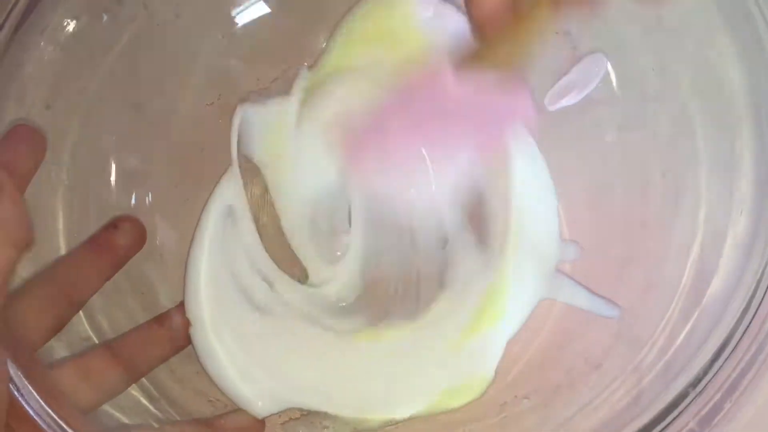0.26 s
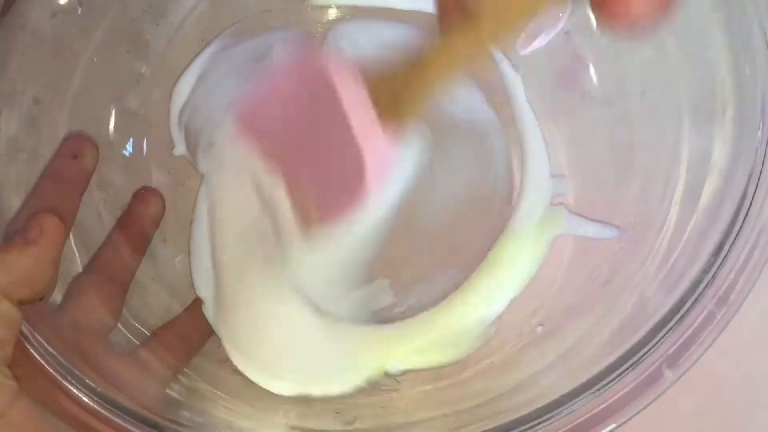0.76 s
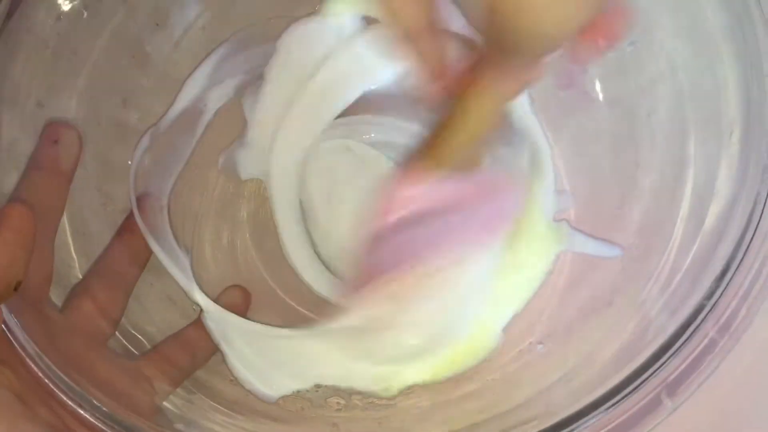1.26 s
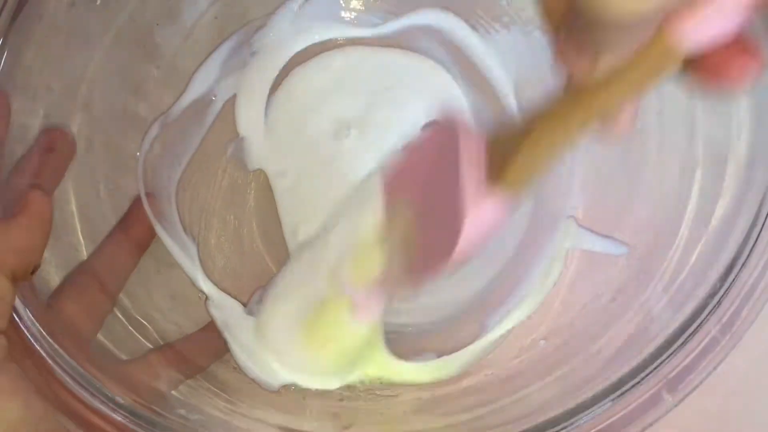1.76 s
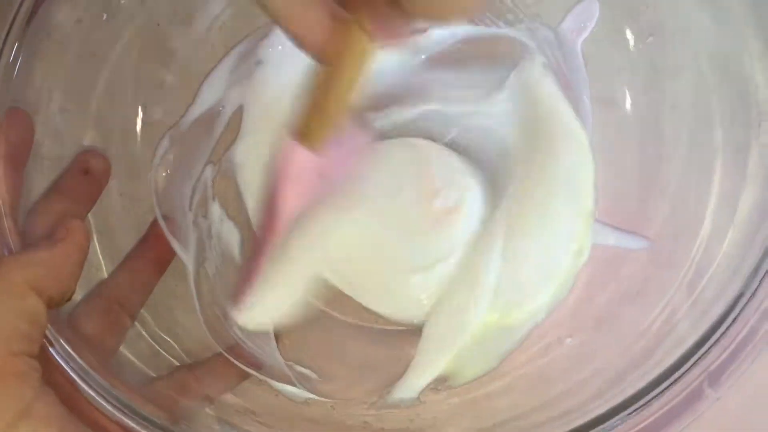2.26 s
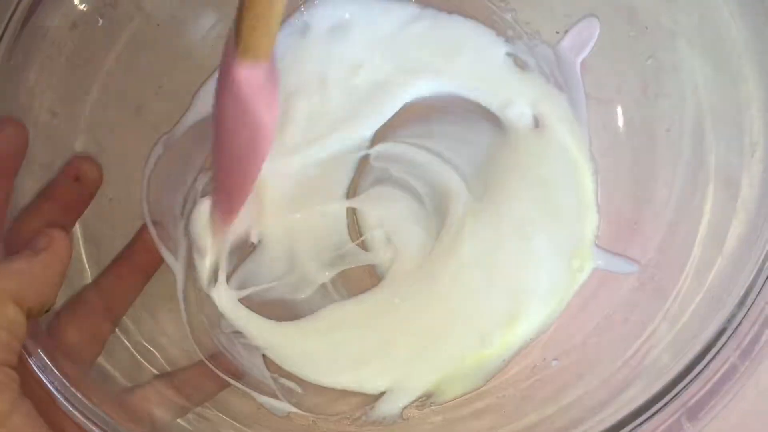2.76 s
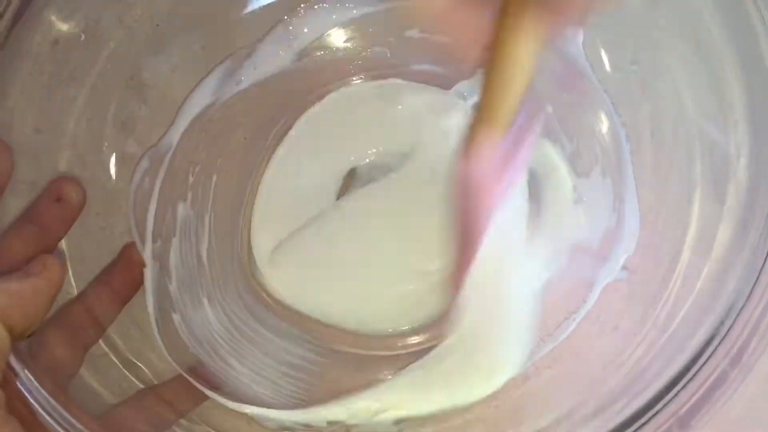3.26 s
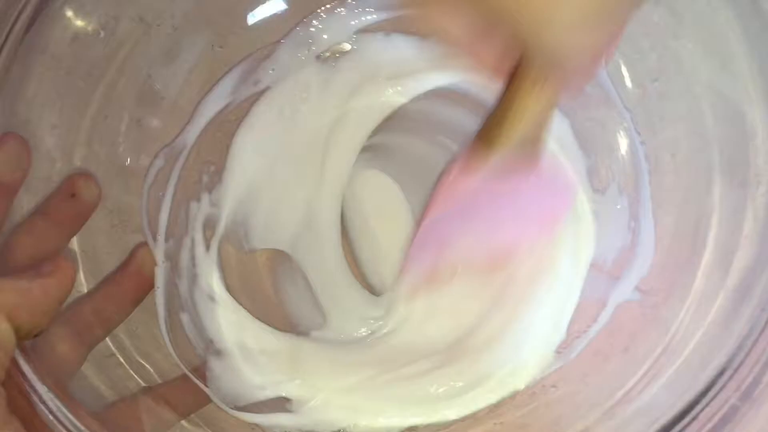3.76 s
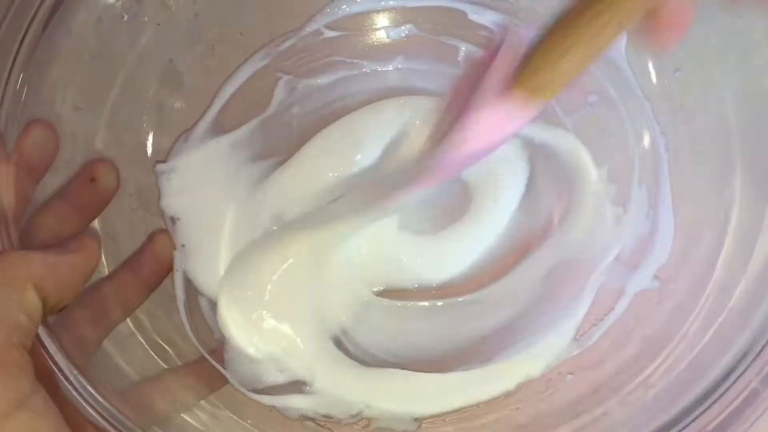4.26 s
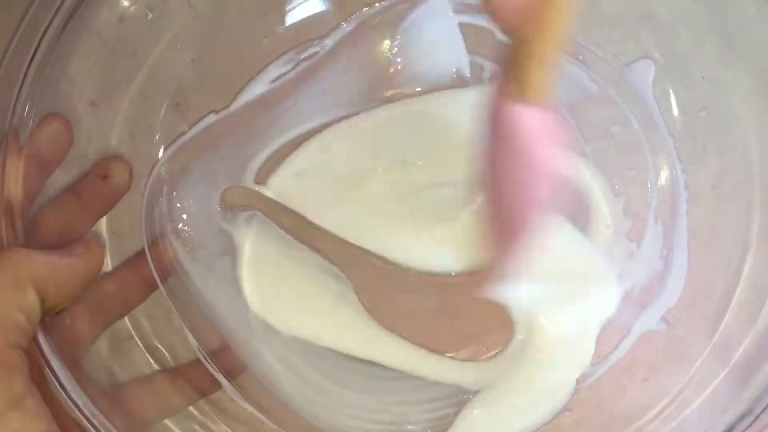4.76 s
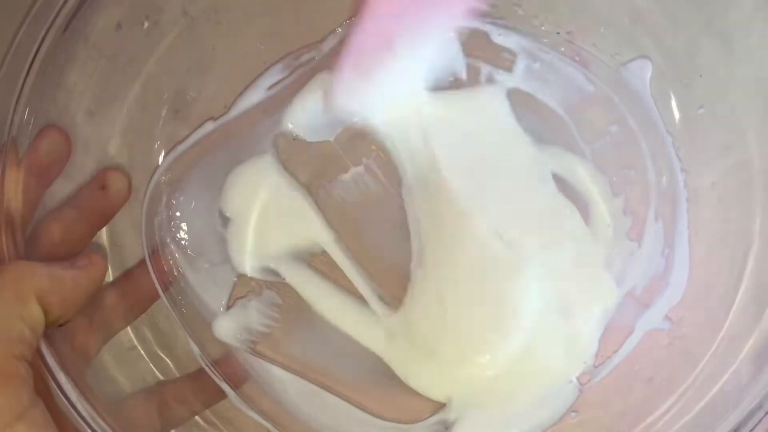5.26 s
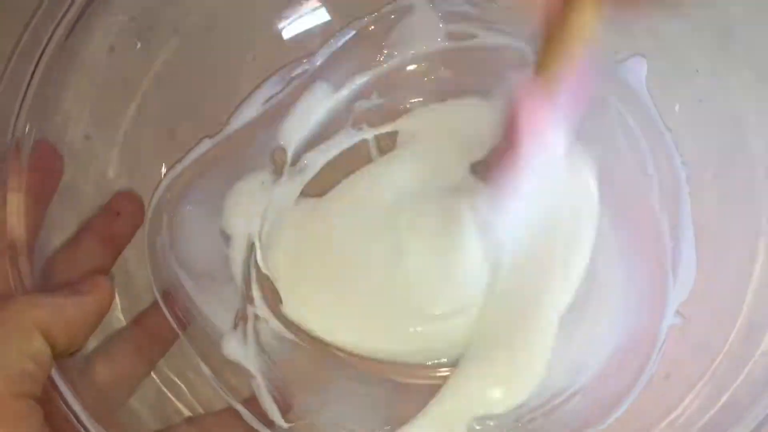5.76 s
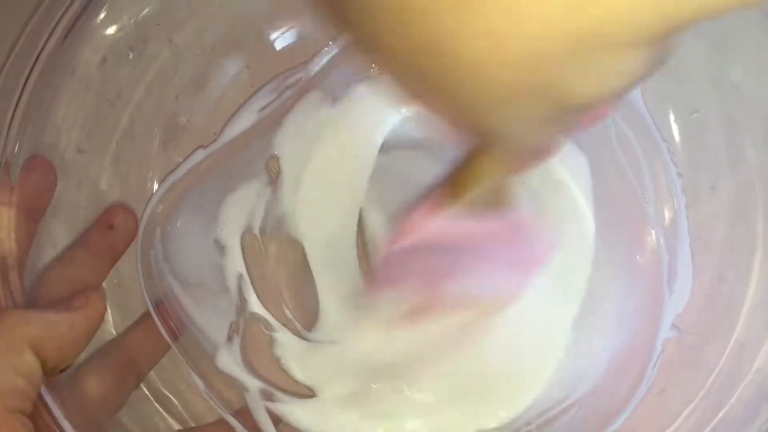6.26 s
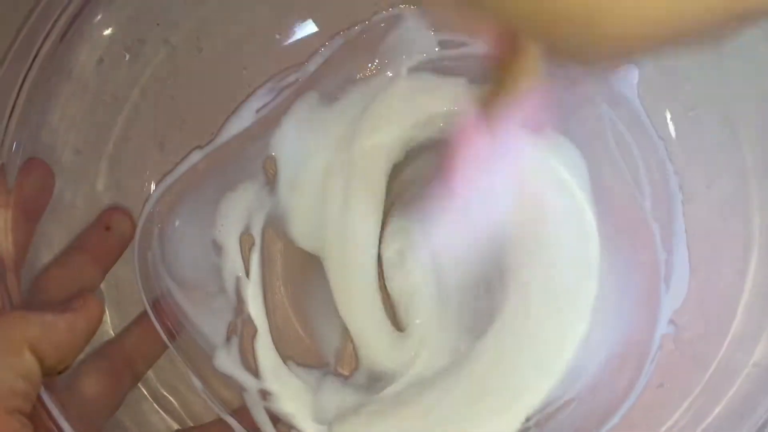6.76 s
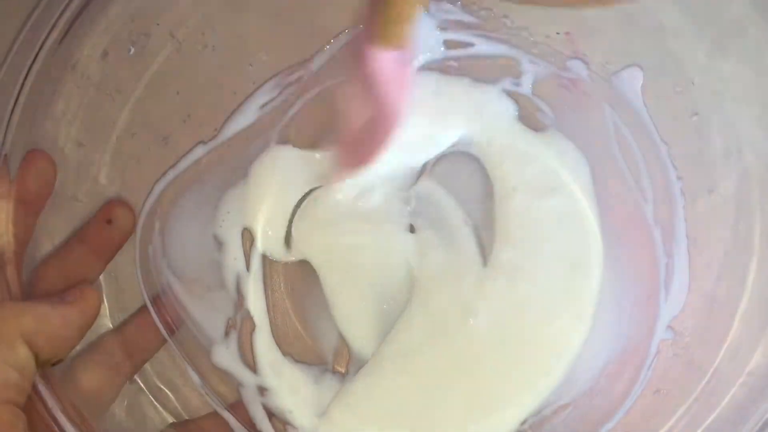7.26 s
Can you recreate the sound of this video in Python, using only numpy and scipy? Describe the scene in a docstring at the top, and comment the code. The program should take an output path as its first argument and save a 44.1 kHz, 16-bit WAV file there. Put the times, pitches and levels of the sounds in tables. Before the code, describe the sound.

Gooey slime is stirred close up, squelching, thumping and snapping with crisp air pops over faint hum, then suddenly lower in pitch.

```python
"""A spatula stirs thick glue and soap in a hand-held glass bowl on a table, close to one microphone above.
Each push is a squelch of ringing wet modes and a dull boom of bowl modes; the drag is uneven filtered noise.
Pops, sticky ticks and peels are bursts of gritty noise; the pops add ringing air pockets, and foam rings faintly.
The small room adds short reflections, noise-band air, a wavering sine hum, a low rumble and one brief drone.
Near six seconds the hum and the bowl's boom drop an octave, and the bubbles and squelches sound deeper."""
import sys
import numpy as np
from scipy import signal
from scipy.io import wavfile
from scipy.ndimage import uniform_filter1d

SR = 44100
rng = np.random.default_rng(int(sys.argv[2]) if len(sys.argv) > 2 else 0)


def put_to_file(sound):
    """Save the sound as 16-bit audio at rate SR, in the file named by the first command-line argument."""
    columns = np.atleast_2d(sound).T  # one column per channel
    safe = np.clip(columns, -1, 1)
    whole_steps = np.round(safe * 32767)
    wavfile.write(sys.argv[1], SR, whole_steps.astype(np.int16))


N = 330923
TIME = np.arange(N) / SR
DEEP_FROM_S = 5.95  # the lower pitches start here
TEAR_S = .007  # stretch of film or strand heard before each pop or tick


def from_db(db):
    """Decibels to gain."""
    return 10 ** (np.asarray(db) / 20)


def rms_one(x):
    """Scaled to an rms of 1."""
    return x / np.sqrt(np.mean(x ** 2) + 1e-20)


def add(out, s, sound):
    """Mix a short sound in at a time in seconds."""
    start = max(0, round(s * SR))
    out[start:start + len(sound)] += sound[:max(0, N - start)]


def band(x, low_hz, high_hz, order=2):
    """Causal band-pass."""
    edges = [low_hz, min(high_hz, SR / 2 - 500)]
    return signal.sosfilt(signal.butter(order, edges, "band", fs=SR, output="sos"), x)


def high_pass(x, hz, order=2):
    """Causal high-pass."""
    return signal.sosfilt(signal.butter(order, hz, "high", fs=SR, output="sos"), x)


def pitch_scale(s):
    """1 at first, a half in the deep part: an octave down."""
    return np.where(s > DEEP_FROM_S, .5, 1)


def drift(rate_hz):
    """Slow random wander with a spread of 1, drawn at every 40th sample and interpolated."""
    pole = np.exp(-80 * np.pi * rate_hz / SR)
    white = rng.standard_normal(N // 40 + 2002)
    slow = signal.lfilter([1], [1, -2 * pole, pole * pole], white)[2000:]  # drop the filter's start
    return np.interp(np.arange(N) / 40, np.arange(len(slow)), rms_one(slow))


def coloured_noise(spectrum):
    """Half-octave bands of noise that follow a spectrum; rms 1."""
    hz, db = np.transpose(spectrum)
    edges = 22 * 2 ** np.arange(0, 10, .5)
    white = rng.standard_normal((2, N))  # neighbouring bands use different noise
    out = 0
    for k, (low, high) in enumerate(zip(edges, edges[1:])):
        if high > hz[0] and low < hz[-1]:
            band_db = np.interp(np.log(low * high) / 2, np.log(hz), db)
            out = out + from_db(band_db) * band(white[k % 2], low, high)
    return rms_one(out)


def ring(t, hz, cycles):
    """A sine that falls by 60 dB in so many cycles."""
    return np.sin(2 * np.pi * hz * t) * np.exp(-np.log(1000) * hz * t / cycles)


def grit(t, low_hz, high_hz, clump_db=4):
    """Noise that comes in clumps a third of a millisecond long, as sticky strands part; rms 1."""
    clump_levels = np.clip(rng.standard_normal(len(t) // 16 + 1), -2, 2)
    clumps = from_db(clump_db * clump_levels).repeat(16)[:len(t)]
    return rms_one(band(rng.standard_normal(len(t)) * clumps, low_hz, high_hz, order=1))


def bubbly(x, low_hz, high_hz, sharpness=10, ring_db=5, count=5):
    """A crackle rings a few tiny bubbles next to it, so each has a colour of its own; the energy is kept."""
    rings = 0
    for place in (np.arange(count) + rng.random(count)) / count:
        hz = min(low_hz * (high_hz / low_hz) ** place, 16000)
        rings = rings + signal.lfilter(*signal.iirpeak(hz, sharpness, fs=SR), x)
    return rms_one(x + from_db(ring_db) * rings) * np.std(x)


# spectrum of the room air: (frequency [Hz], relative density [dB per Hz])
AIR_SPECTRUM = [(30, -42.5), (60, -29.5), (100, 4.5), (140, -2.5), (220, 2.5), (330, -11.5), (500, -32),
                (800, -15.5), (1600, -17.5), (3000, -23), (6000, -29), (15500, -30.5)]
# spectrum of the low rumble: (frequency [Hz], relative density [dB per Hz])
RUMBLE_SPECTRUM = [(25, -33.5), (45, 12), (62, -6), (95, 16.5), (125, -5.5), (200, -34), (400, -34.5)]
# hum before it drops and wavers: (frequency [Hz], peak level [dB])
HUM_TONES = [(100, -67.5), (200, -58.5), (243, -94.5)]
AIR_DB = -62.5
FIRST_RUMBLE_DB, FIRST_RUMBLE_S = -50.5, 0.078
DEEP_RUMBLE_DB, RUMBLE_FADE_DB_PER_S = -54.5, 4


def background(low_cut_hz=80, waver_db=3):
    """Room air and a wavering hum; a low rumble sounds briefly at first and again, fading, in the deep part."""
    turns = np.cumsum(pitch_scale(TIME)) / SR  # advances at half speed in the deep part
    hum = 0
    for hz, db in HUM_TONES:
        level = from_db(db + waver_db * drift(3))
        hum = hum + level * np.sin(2 * np.pi * hz * turns + 1.1 * drift(6.6))
    since = TIME - DEEP_FROM_S
    first_swell = (TIME < FIRST_RUMBLE_S) * from_db(FIRST_RUMBLE_DB)
    deep_swell = (since > 0) * from_db(DEEP_RUMBLE_DB - RUMBLE_FADE_DB_PER_S * since)
    swell = uniform_filter1d(first_swell + deep_swell, size=400)  # softened edges
    rumble = swell * from_db(3.5 * drift(9)) * coloured_noise(RUMBLE_SPECTRUM)
    air = high_pass(coloured_noise(AIR_SPECTRUM), low_cut_hz, order=3)
    return from_db(AIR_DB) * air + hum + rumble


# drag of the blade through the glue, before the gains below: (time [s], level [dB])
DRAG_LEVELS = [(0.0, -60), (0.44, -67), (1.15, -62), (1.25, -65), (1.9, -66.5), (2.5, -57), (2.96, -65),
               (3.26, -63.5), (3.74, -51), (4.18, -65.5), (5.49, -66), (5.75, -55.5), (5.97, -53.5),
               (6.43, -55), (6.71, -61), (7.16, -66.5), (7.5, -69)]
# spectrum of the low rub: (frequency [Hz], relative density [dB per Hz])
RUB_SPECTRUM = [(85, -24), (110, -4.5), (140, 6), (180, -2.5), (230, 10.5), (300, -8), (380, 1),
                (520, -2.5), (1200, -14.5), (2500, -38.5), (6000, -34)]
# spectrum of the blade's swish: (frequency [Hz], relative density [dB per Hz])
SWISH_SPECTRUM = [(700, -17), (1200, 1), (2200, -3), (3200, -7), (5000, 0.5), (8000, -9.5), (15000, -15)]


def stirring(rub_db=-1, uneven_db=6.0, smear_db=-13, swish_db=-15, smear_uneven_db=1.5):
    """The blade drags unevenly: a low rub, and a wet smear and swish that are fainter in the deep part."""
    s, drag_db = np.transpose(DRAG_LEVELS)
    drag = from_db(np.interp(TIME, s, drag_db))
    uneven = np.clip(drift(8.9), -2, 1.5)
    lumps = from_db(4.8 * drift(60) + smear_uneven_db * uneven) * pitch_scale(TIME)
    rub = from_db(rub_db + uneven_db * uneven) * coloured_noise(RUB_SPECTRUM)
    smear = from_db(smear_db) * band(grit(TIME, 470, 1800), 460, 7900)
    swish = from_db(swish_db) * coloured_noise(SWISH_SPECTRUM)
    return drag * (rub + (smear + swish) * lumps)


# modes of the bowl, before detuning:
# (multiple of lowest pitch, relative level [dB], decay by 60 dB [own cycles], build-up [cycles of lowest])
BOWL_MODES = [(1.0, -2.5, 15, 2.17), (1.2, -8.5, 15, 3.5), (1.66, 5, 18, 0.65), (2.096, -9, 44, 0.11)]


def bowl_boom(t, hz, boom_db, knock_db, rock_cycles=6.3, rock_db=-11, detune=0.039):
    """The two upper modes swell sooner than the two lower, so the thud falls; the bowl rocks back once."""
    sound = 0
    for multiple, db, cycles, build_cycles in BOWL_MODES:
        mode_hz = hz * multiple * (1 + detune * rng.standard_normal())
        mode = ring(t, mode_hz, cycles) * (1 - np.exp(-(hz * t / build_cycles) ** 3))
        level_db = db + (boom_db if multiple < np.sqrt(2) else knock_db)
        sound = sound + rng.choice([-1, 1]) * from_db(level_db) * mode / np.abs(mode).max()
    lag = int(SR * rock_cycles / hz * rng.uniform(0.93, 1.3))
    return sound + from_db(rock_db) * np.r_[np.zeros(lag), sound[:-lag]]


# wet glue squeezed under the blade, before detuning:
# (multiple of squelch pitch, relative level [dB], decay by 60 dB [cycles])
SQUELCH_MODES = [(.55, -12, 20), (.75, -5, 14), (1.002, 3.5, 17), (1.15, -11.5, 54), (1.4, -3.5, 18)]


def squelch(t, hz, slip_cycles=4.9, slip_fall_db=5.5, detune=0.026, count=6):
    """The blade slips a few times in quick succession; each slip rings the wet cavity under it."""
    sound = 0
    for k in range(count):
        since = np.maximum(t - slip_cycles / hz * (k + rng.uniform(0, 0.46)), 0)
        for multiple, db, cycles in SQUELCH_MODES:
            mode_hz = hz * multiple * (1 + detune * rng.standard_normal())
            mode = from_db(db - slip_fall_db * k) * ring(since, mode_hz, cycles)
            sound = sound + rng.choice([-1, 1]) * mode
    sound = band(sound, 0.3 * hz, 2.3 * hz)
    return sound / np.sqrt(np.mean(sound[hz * t < 14] ** 2))  # rms 1 over the first 14 cycles


# spatula nudging the bowl: (time [s], boom level before trim [dB], squelch level [dB], squelch pitch [Hz])
PUSHES = [(.059, -39.5, -60, 890), (.182, -40.5, -47.5, 1036), (0.333, -33, -43, 1307),
          (0.543, -21, -36.5, 706), (.627, -40.5, -50, 1100), (.781, -56, -60, 846),
          (.951, -27.5, -37, 1104), (1.083, -30.5, -49, 1110), (1.229, -35, -50, 1190),
          (1.549, -26.5, -57.5, 640), (1.614, -59, -61.5, 1130), (1.655, -35, -55, 1145),
          (2.01, -64, -52.5, 780), (2.121, -39.5, -61, 726), (2.265, -29, -43.5, 1146),
          (2.389, -35, -45, 1067), (2.49, -26.5, -40, 1110), (2.61, -35.5, -49, 920),
          (2.813, -34.5, -54.5, 1036), (2.868, -44.5, -56.5, 994), (2.921, -38, -66.5, 1160),
          (3.269, -41.5, -48, 753), (3.334, -50, -49.5, 1030), (3.35, -30.5, -50, 1160),
          (3.497, -32, -43.5, 1117), (3.577, -38.5, -50, 810), (3.625, -29.5, -35, 1177),
          (3.69, -37, -48, 810), (3.74, -22, -29.5, 1080), (3.807, -33, -49, 700),
          (3.849, -24.5, -34.5, 1066), (3.966, -43.5, -51, 1140), (4.049, -37, -50, 773),
          (4.097, -39.5, -45.5, 1040), (4.12, -32, -53, 1140), (4.406, -47, -58, 930),
          (4.486, -41, -47, 750), (4.519, -40, -59.5, 956), (4.581, -44, -63, 826),
          (4.673, -40, -64.5, 643), (4.896, -41.5, -57, 1060), (5.133, -43.5, -55, 1024),
          (5.418, -42.5, -56.5, 712), (5.769, -33, -33, 967), (5.838, -23.5, -33.5, 1116),
          (5.985, -39, -52, 411), (6.109, -52, -45.5, 410), (6.138, -67, -43, 630),
          (6.185, -36.5, -39.5, 740), (6.319, -50, -50.5, 407), (6.388, -36, -45.5, 451),
          (6.537, -63, -51, 420), (6.615, -35.5, -40.5, 526), (6.761, -44, -45.5, 403),
          (6.85, -38, -52.5, 365), (6.96, -68, -48.5, 710), (7.052, -47.5, -60.5, 523),
          (7.145, -48.5, -52, 379), (7.324, -42, -54.5, 478)]
BOWL_HZ = 218.5  # lowest bowl mode before detuning and the octave drop


def thuds(boom_trim_db=-1, knock_trim_db=-3.0, spray_db=-8, spray_cycles=2.6):
    """Each push squelches with a gritty spray as the bowl booms; its upper modes follow both levels."""
    out, t = np.zeros(N), np.arange(SR // 4) / SR
    brief = t[:len(t) // 3]
    for s, boom_db, wet_db, wet_hz in PUSHES:
        hz = BOWL_HZ * pitch_scale(s)
        knock_db = (boom_db + wet_db) / 2 + knock_trim_db
        add(out, s, bowl_boom(t, hz, boom_db + boom_trim_db, knock_db))
        spray = band(grit(brief, 4 * hz, 16 * hz), 3 * hz, 20 * hz) * np.exp(-hz * brief / spray_cycles)
        add(out, s, from_db(wet_db) * squelch(brief, wet_hz) + from_db(wet_db + spray_db) * spray)
    return out


# sticky strands snapping: (time [s], level [dB])
SNAPS = [(.076, -28), (0.1156, -43), (0.2705, -25), (0.3875, -33.5), (0.6195, -31.5), (1.0724, -32),
         (1.135, -32), (1.8682, -28), (2.1902, -27), (2.337, -30), (2.4482, -31), (2.5452, -24.5),
         (3.018, -47), (3.5658, -18.5), (3.678, -27.5), (3.7935, -24.5), (4.0816, -37), (4.368, -33.5),
         (4.771, -32), (4.931, -40.5), (5.098, -30.5), (5.228, -37), (5.369, -41.5), (5.431, -57.5),
         (5.902, -33.5), (6.277, -29.5), (6.734, -43), (6.972, -26.5)]


def ticks(low_hz=2800, high_hz=17000, snap_s=.0005, lead_s=.0001, creak_db=-17, creak_s=.002,
          low_cut_hz=1500):
    """A strand creaks as it thins, then snaps with a bright crackle; slower and wider in the deep part."""
    out, t = np.zeros(N), np.arange(SR // 45) / SR - TEAR_S
    for s, db in SNAPS:
        scale = pitch_scale(s)
        snap = np.exp(scale * np.minimum(t / lead_s, -t / snap_s))
        creak = from_db(creak_db) * np.exp(-scale * np.abs(t) / creak_s)
        low = scale * low_hz
        crackle = bubbly((snap + creak) * grit(t, low, high_hz), low, high_hz)
        add(out, s - TEAR_S, from_db(db) * crackle)
    return high_pass(out, low_cut_hz)


def foam(mean_db=-47, spread_db=4, scatter_s=0.028, lowest_hz=700, cycles=9, count=200):
    """Faint bubbles of many sizes ring briefly, scattered around randomly chosen pushes and snaps."""
    out, moments = np.zeros(N), [row[0] for row in SNAPS + PUSHES]
    t = np.arange(SR // 30) / SR
    draws = np.c_[rng.random((count, 2)), rng.standard_normal((count, 2))]
    for which, size, when, strength in draws:
        s = moments[int(which * len(moments))] + scatter_s * when
        hz = pitch_scale(s) * lowest_hz * 9 ** size
        bubble = ring(t, hz, cycles) * (1 - np.exp(-2 * hz * t))
        add(out, s, from_db(mean_db + spread_db * strength) * bubble)
    return out


POP_CYCLES = 10.7  # every pocket dies away in about so many cycles
POP_RISE = .02  # share by which its pitch rises on each cycle as it opens
CRACKLE_S, CRACKLE_REF_DB = 0.0006, -24  # a tear this loud has that decay time
DB_PER_DOUBLING = 10.5  # weaker tears take longer


def pop(db, hz, crackle_db, scale, crackle_low_hz=2100, crackle_high_hz=12000, low_share=0.24,
        overtone_db=-10, open_cycles=0.99, lead_s=0.000083, creak_db=-17, creak_s=0.00076):
    """The film creaks, then bursts; the opened air pocket rings, and is too small to radiate bass."""
    t = np.arange(SR // 45) / SR - TEAR_S
    after, before = np.maximum(t, 0), np.minimum(t, 0)
    slower = np.clip(2 ** ((CRACKLE_REF_DB - crackle_db) / DB_PER_DOUBLING), .5, 2)
    burst = np.exp(before / lead_s - after / (CRACKLE_S * slower)) / np.sqrt(slower)
    stretch = from_db(creak_db) * np.exp(-np.abs(t) * scale / creak_s)
    low, high = scale * crackle_low_hz, np.sqrt(scale) * crackle_high_hz  # duller in the deep part
    tear = bubbly(grit(t, low, high) * (burst + stretch), low, high)
    overtone_hz = min(hz * rng.uniform(1.25, 1.7), 15500)
    rising = after * (1 + POP_RISE * (np.minimum(hz * after, POP_CYCLES) / 2 - 1))
    cavity = ring(rising, hz, POP_CYCLES) + from_db(overtone_db) * ring(after, overtone_hz, POP_CYCLES)
    opening = 1 - np.exp(-hz * after / open_cycles)
    sound = from_db(db) * opening * cavity + from_db(crackle_db) * tear
    return high_pass(sound, min(low_share * hz, 1500))


# air pockets bursting: (time [s], ring level [dB], pitch [Hz], crackle level [dB])
AIR_POCKETS = [(0.142, -9, 5950, -27.5), (.213, -8, 2370, -34), (.2566, -11, 7800, -32),
               (0.3346, -10.5, 4460, -26), (0.4061, -17.5, 6100, -43), (1.082, -22.5, 2470, -41),
               (1.167, -12.5, 2830, -32.5), (1.2463, -22, 2410, -59), (1.2771, -18, 4750, -31),
               (1.305, -20.5, 3280, -32.5), (1.4345, -16.5, 7100, -25.5), (2.1228, -21.5, 2600, -37.5),
               (2.216, -19, 2760, -39), (2.2873, -24, 2300, -50), (2.469, -21.5, 2770, -50),
               (2.5008, 2, 2260, -19), (2.565, -14.5, 3120, -30), (2.6827, -20.5, 2680, -21),
               (2.883, -33, 5180, -65.5), (3.135, -28, 1690, -61.5), (3.263, -29.5, 4630, -55),
               (3.447, -27.5, 3840, -29.5), (3.4838, -21.5, 2490, -32.5), (3.6395, 2, 2310, -22),
               (3.69, -4, 2980, -29), (3.7491, -16, 3670, -30), (3.802, -7.5, 2550, -21.5),
               (3.8684, -1.5, 2330, -21.5), (3.9102, -7.5, 2930, -21), (3.9845, -24.5, 2750, -38),
               (4.011, -20.5, 4240, -37), (4.2239, -13, 12100, -66), (4.7908, -12, 1550, -21),
               (4.9694, -13, 2360, -40.5), (5.179, -23.5, 2370, -41.5), (5.8406, -15.5, 2606, -33.5),
               (6.0132, -10.5, 1235, -30.5), (6.097, -4.5, 4880, -13), (6.188, -24, 1380, -33),
               (6.203, 1, 1260, -23.5), (6.2809, -7.5, 3750, -35), (6.3032, -9, 1960, -18),
               (6.413, -22.5, 2400, -37), (6.4236, -4, 1183, -22.5), (6.4966, -40, 2420, -18),
               (6.5072, -10.5, 2530, -51), (6.5153, -9, 2030, -27), (6.65, -12, 1180, -25),
               (6.778, -29, 2480, -46), (6.8766, -16.5, 1215, -39.5), (7.0711, -26, 4400, -63)]


def pops(flap_db=-16, flap_cycles=0.81):
    """The larger air pockets; the torn film flaps around each one's pitch for a few cycles."""
    out, t = np.zeros(N), np.arange(SR // 45) / SR - TEAR_S
    for s, db, hz, crackle_db in AIR_POCKETS:
        cycle = hz * t
        fading = np.exp(np.minimum(cycle, -cycle / flap_cycles))
        noise = band(rng.standard_normal(len(t)), 0.65 * hz, min(1.71 * hz, 16500))
        flap = from_db(db + flap_db) * rms_one(noise) * fading
        add(out, s - TEAR_S, pop(db, hz, crackle_db, pitch_scale(s)) + flap)
    return out


def tiny_pops(below_db=-21, loudest_db=-31, spread_db=3, scatter_s=0.0088, crackle_db=-13,
              lowest_hz=2100, count=2):
    """Each large pocket takes a few small neighbours with it, just before or after."""
    out = np.zeros(N)
    for s, db, *_ in AIR_POCKETS:
        scale = pitch_scale(s)
        for size, when, strength in np.c_[rng.random(count), rng.standard_normal((count, 2))]:
            small_db = min(db + below_db, loudest_db) + spread_db * strength
            small_hz = scale * lowest_hz * 4 ** size
            small_pop = pop(small_db, small_hz, small_db + crackle_db, scale)
            add(out, s - TEAR_S + scatter_s * when / scale, small_pop)
    return out


# glue peeling off the glass: (time [s], level [dB], centre frequency [Hz])
PEELING = [(3.569, -47, 9100), (6.108, -38, 3900), (6.971, -47, 10200)]


def peels(fade_s=0.018, width=1.4, spray_db=-6):
    """A sheet of glue lets go in a dense, dying crackle: one narrow band of bubbles and a broad spray."""
    out, t = np.zeros(N), np.arange(SR // 8) / SR
    for s, db, hz in PEELING:
        low, high = hz / width, hz * width
        bubbles = rms_one(band(grit(t, low, high, clump_db=6), low, high))
        spray = from_db(spray_db) * grit(t, 2800, 14000, clump_db=7)
        add(out, s, from_db(db) * np.exp(-t / fade_s) * (bubbles + spray))
    return out


DRONE_AT_S, DRONE_SPREAD_S, DRONE_DB = 4.35, 0.42, -55  # time and level of the peak; time to fall to 1/e


def drone(low_hz=98, high_hz=135):
    """A narrow band of low noise that swells and fades once."""
    swell = np.exp(-((TIME - DRONE_AT_S) / DRONE_SPREAD_S) ** 2)
    return from_db(DRONE_DB) * swell * rms_one(band(rng.standard_normal(N), low_hz, high_hz))


def bowl_echoes(x, echo_db=-21, count=8):
    """Sound bounces between the glass walls for a few milliseconds, flipping sign and losing 1 dB each time."""
    out = x.copy()
    for k, lag in enumerate((np.geomspace(.0011, .0075, count) * SR).astype(int)):
        out[lag:] += (-1) ** k * from_db(echo_db - k) * x[:-lag]
    return out


def room(x, t60, wall_hz, build_s=0.00043):
    """Dense reflections from the table and near walls: a decaying noise tail, duller above wall_hz."""
    t = np.arange(SR // 2) / SR
    noise = band(rng.standard_normal(len(t)), 100, wall_hz, order=1)
    tail = noise * from_db(-60 * t / t60) * (1 - np.exp(-t / build_s))
    return signal.fftconvolve(x, tail / np.sqrt(np.sum(tail ** 2)))[:N]


def scene(room_db=-18, deep_room_db=-22.0, bubble_low_cut_hz=280):
    """Everything in the bowl, heard from just above it; the deeper sounds at the end also linger longer."""
    bubbles = high_pass(ticks() + foam() + pops() + tiny_pops() + peels(), bubble_low_cut_hz)
    bowl = high_pass(stirring(), 80) + thuds() + bowl_echoes(bubbles)
    deep = TIME > DEEP_FROM_S
    tail = from_db(room_db) * room(bowl * ~deep, t60=0.12, wall_hz=9000)
    deep_tail = from_db(deep_room_db) * room(bowl * deep, t60=.35, wall_hz=7750)
    return (background() + bowl + tail + deep_tail + drone())[None]


def record(dry):
    """The microphone's top is cut steeply at 16.6 kHz."""
    return signal.sosfilt(signal.ellip(10, .1, 80, 16600, fs=SR, output="sos"), dry)


dry = scene()
out = record(dry)
put_to_file(out)
```